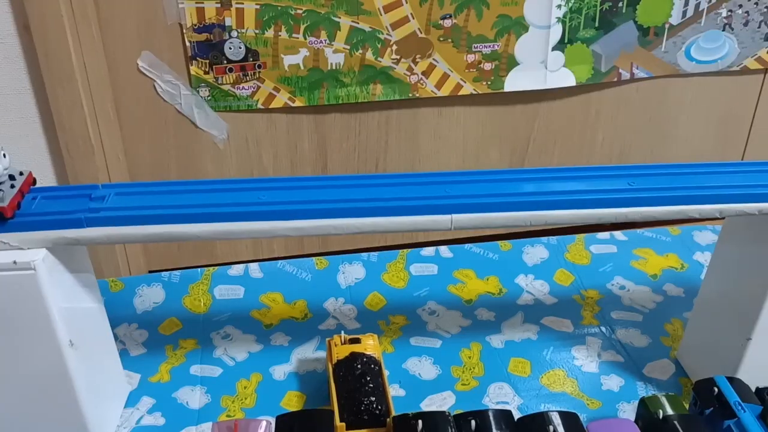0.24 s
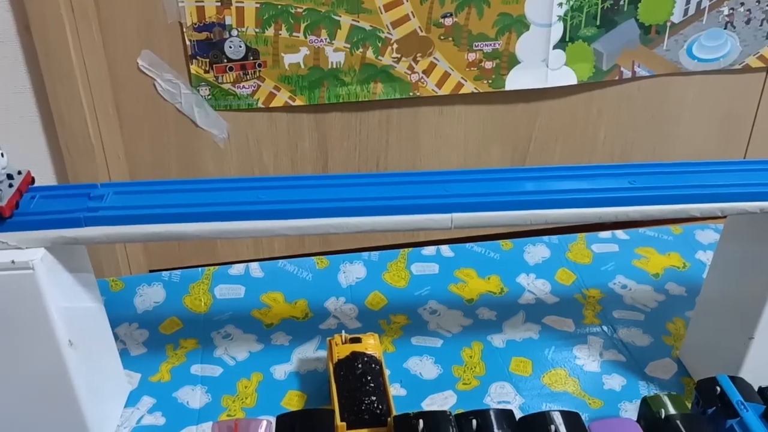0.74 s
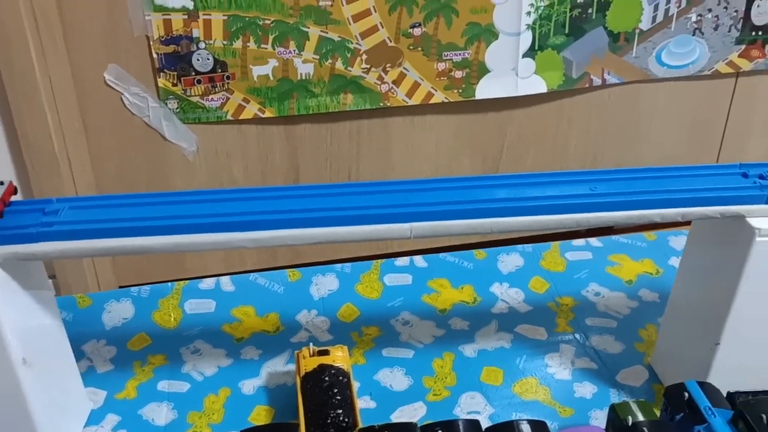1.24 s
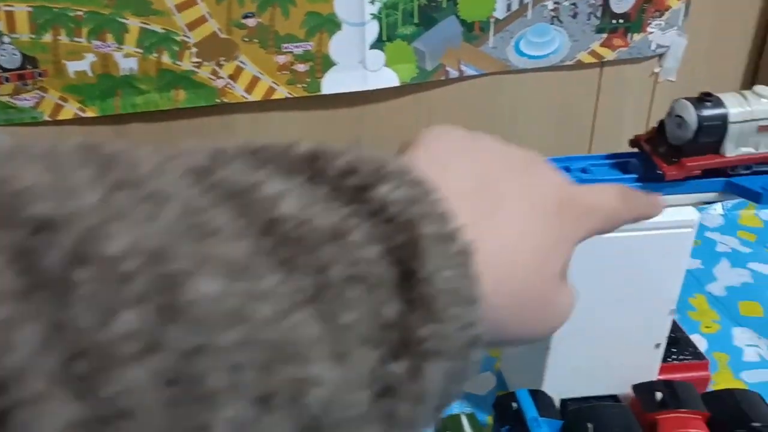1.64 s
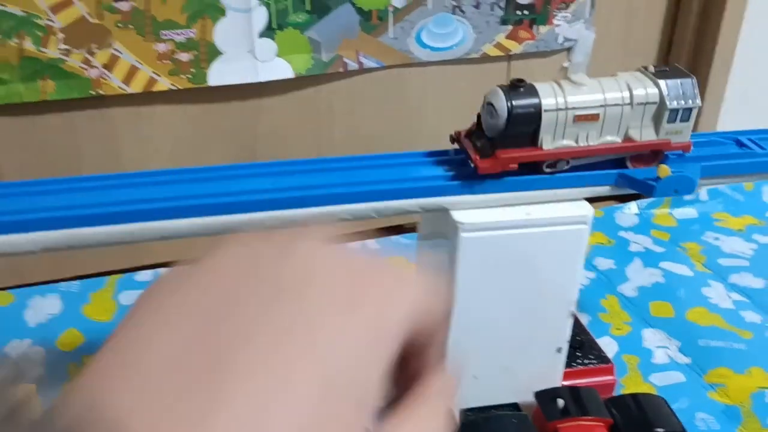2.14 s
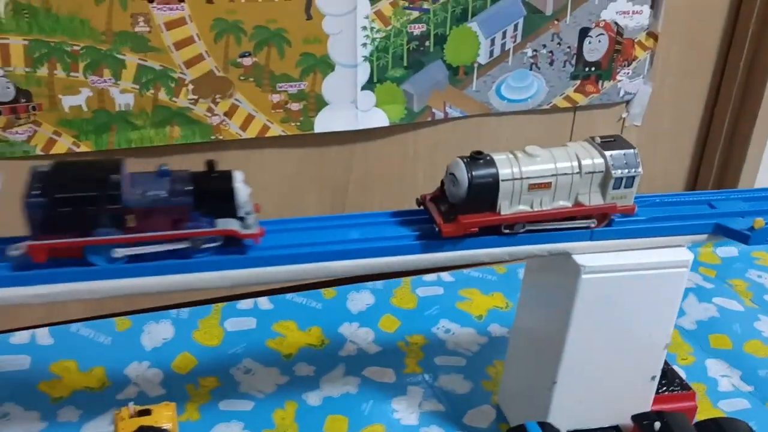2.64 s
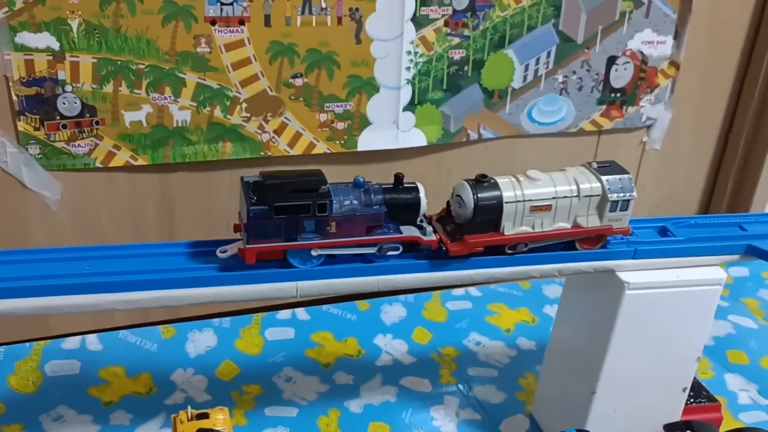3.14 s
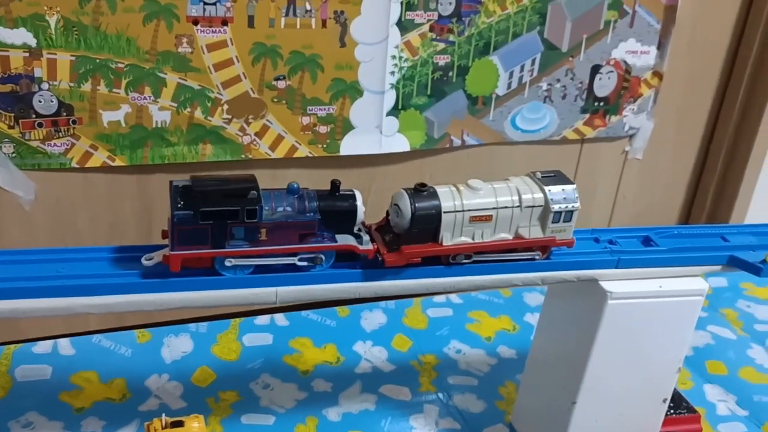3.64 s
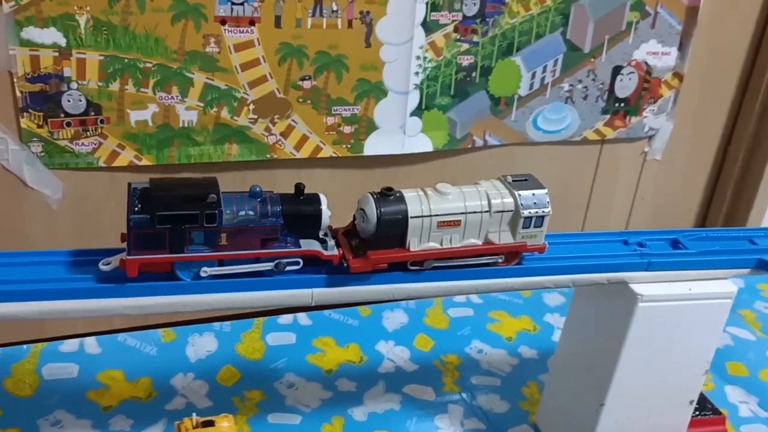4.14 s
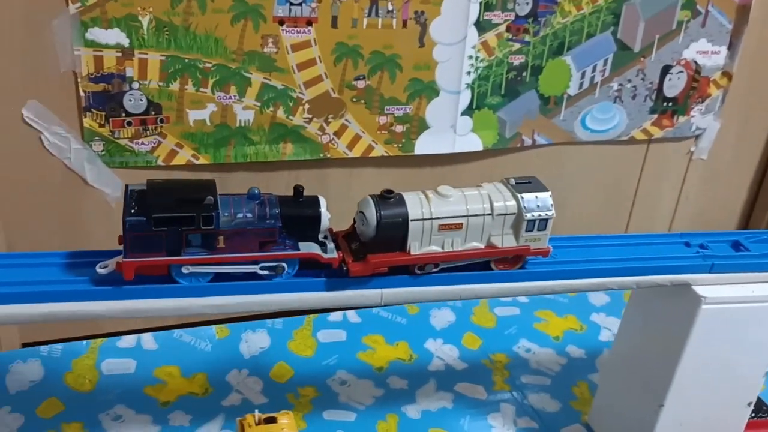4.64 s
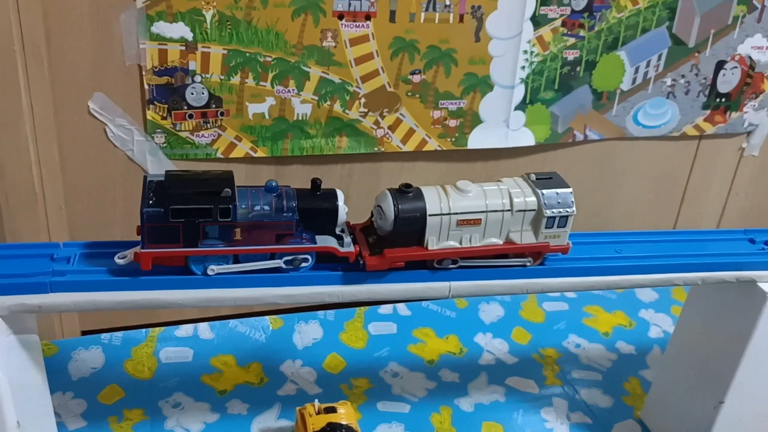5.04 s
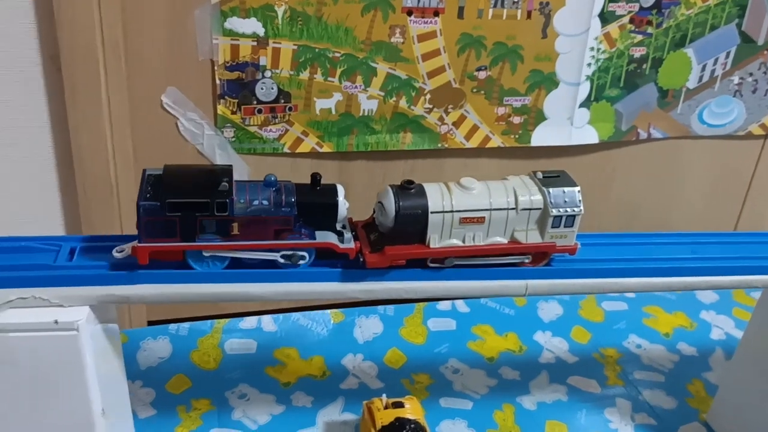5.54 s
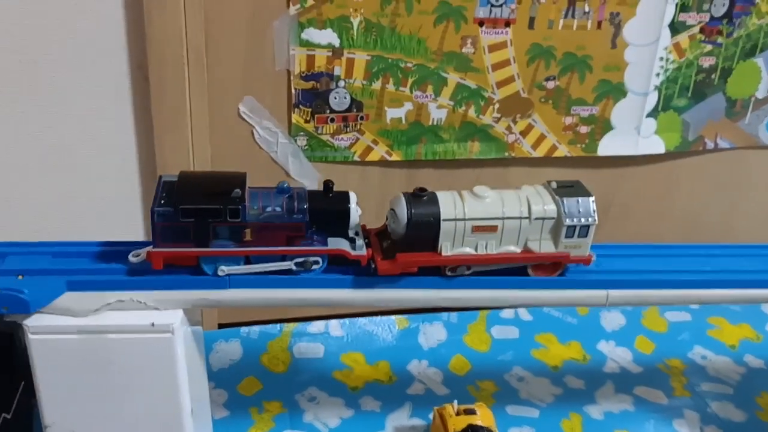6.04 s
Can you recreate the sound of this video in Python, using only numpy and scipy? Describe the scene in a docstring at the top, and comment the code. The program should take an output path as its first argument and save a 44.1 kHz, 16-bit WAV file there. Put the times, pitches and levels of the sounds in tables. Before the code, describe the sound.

In a quiet room, a battery toy engine whirs with chattery plastic gears and little track knocks. A second, nearer engine joins, brighter and busier. They collide with a hard plastic knock around three seconds, rolling stops, and slipping gears clack sharply about ten times a second over a straining motor whine until the end. Close stereo microphone.

```python
"""Over a low room hush and faint wavering tones, two battery toy engines roll on a plastic track.
Gear teeth chatter as trains of uneven blows on noise, filtered by the resonances of the plastic shells;
knocks are decaying noise bursts, and soft bumps are damped cosines. The engines then meet nose to nose and
push: a gear strains, with mesh noise and a resonant motor whine, and slips ten times a second with a sharp
noise-burst clack that the walls return. The two microphone ports colour the sound differently."""
import sys
import numpy as np
from scipy import signal
from scipy.fft import rfft, irfft
from scipy.io import wavfile
from scipy.ndimage import uniform_filter1d

SR = 44100
rng = np.random.default_rng(int(sys.argv[2]) if len(sys.argv) > 2 else 0)


def log_audio(samples):
    """Write samples as a 16-bit WAV file to the path given in sys.argv[1]."""
    # one column per channel
    frames = np.atleast_2d(samples).T
    # limit to full scale, then quantise
    limited = np.clip(frames, -1, 1)
    pcm = np.round(limited * 32767).astype(np.int16)
    wavfile.write(sys.argv[1], SR, pcm)


def field_ratio(decibels):
    """Amplitude ratio for a level in dB (20 dB per decade); scalars and array-likes work."""
    return 10 ** (np.asarray(decibels, dtype=float) / 20)


N = 277830
TIME = np.arange(N) / SR  # seconds

# All levels below are ahead of the gain in FADE_IN. Spectra and resonances shape a sound;
# its level is set separately. Resonance heights are relative to the surrounding spectrum.

# Spectrum of the room hush. Each row: frequency in Hz, relative density in dB per Hz.
HUSH_SPECTRUM = [(18, -83), (30, -51), (103, -4.5), (245, -9), (371, -7.5), (407, -9.5), (546, -15.5),
                 (1200, -10.5), (1560, -49), (2640, -120)]
HUSH_DB = -68  # rms of the wavering hush
# Faint wavering tones and squeals. Each row: start in seconds, end in seconds, first pitch in Hz,
# last pitch in Hz, width in Hz, left level in dB, right level in dB.
FUZZY_TONES = [(0, 2, 960, 935, 5, -71, -71.5), (2.62, 2.92, 194, 264, 23, -68, -66),
               (1.42, 1.86, 3560, 3600, 120, -54, -60), (1.72, 1.98, 2230, 2110, 140, -54, -50),
               (2.06, 2.38, 2050, 2120, 110, -58, -54.5), (2.2, 2.55, 5150, 5280, 170, -65, -55)]

# Chatter as the engines move about. Each row: time in seconds, chatter level in dB.
CHATTER = [(0.3, -53.5), (0.45, -55), (1.04, -55.5), (1.18, -50), (1.41, -56), (1.64, -57.5), (1.86, -57),
           (2.15, -54.5), (2.4, -53.5), (3.0, -54), (3.12, -54.5), (3.21, -50.5)]
USUAL_DB = -55  # chatter level at which the three bands have their usual levels
# The chatter surges, then lets go. Each row: end in seconds, length in seconds, rise in dB.
SURGES = [(0.408, 0.086, 4), (0.807, 0.1, 4.5), (1.255, 0.057, 7), (1.342, 0.057, 3.5), (1.648, 0.24, 5),
          (1.883, 0.092, 2), (2.35, 0.17, 3), (2.492, 0.026, 3), (2.628, 0.048, 5), (2.778, 0.16, 2),
          (3.018, .05, 8.5), (3.07, 0.045, 5), (3.188, 0.031, 3)]
SURGE_RISE, LET_GO_S = 0.12, 0.01  # share of the length spent rising, time to drop back
# Part of the second engine in the sound. Each row: time in seconds, share from 0 to 1.
SECOND_SHARE = [(0, 0.12), (1.3, 0.34), (1.65, 0.58), (1.8, 0.82), (2.05, 0.7), (2.3, 0.46), (2.55, 0.57),
                (2.7, 0.6), (2.95, 0.84), (3.14, 0.97), (3.24, 0.87)]
# First engine through the ports. Each row: frequency in Hz, left gain in dB, right gain in dB.
FIRST_SPECTRUM = [(60, -5, -14), (149, -9.5, -18), (673, -10.5, -18.5), (1750, -0.5, -2), (1617, 1, -0.5),
                  (6260, -4.5, -0.5), (5870, 0, -10), (7600, -12, -3.5), (7400, -43, -35), (8160, -5, -14),
                  (8400, -21, -23.5), (11720, -35.5, -60), (11100, -12, -35), (15700, -17.5, -30)]
# Second, nearer engine. Each row: frequency in Hz, left gain in dB, right gain in dB.
SECOND_SPECTRUM = [(60, -14, -12), (152, -6, -16.5), (700, -14, -4.5), (1490, -28, -5.5), (1900, -1.5, 3),
                   (5400, -6, 0.5), (6000, 2.5, -4.5), (7490, 4, -4.5), (7800, -2.5, -59),
                   (8470, -14.5, -45), (8700, -24, -58), (11200, -33, -63), (11520, -13, -32),
                   (15100, -18, -50)]
# Resonances of the engine shells. Each row: frequency in Hz, width in Hz, left and right height in dB.
FIRST_SHELL = [(1750, 200, 6, 8), (2160, 110, 15, 14), (2650, 140, 11, 14), (3560, 160, 12, 14),
               (4400, 200, 4, 6), (4900, 120, 5, 9), (5200, 260, 11, 14)]
SECOND_SHELL = [(478, 160, 11, 4.1), (1270, 300, 1.7, 1.7), (1520, 190, 1.7, 13.6), (2100, 290, 2.1, 6.1),
                (2412, 15, 26, 6.8), (3950, 840, 18, 12.8), (4630, 510, 0.57, 16), (5540, 130, 2.4, 2.2)]
# How each band of the chatter follows. Each row: level in dB at usual chatter, dB per dB of chatter,
# dB added at full share of the second engine, flicker in dB.
LOW_SHELL = (-55.5, 0.85, 6.5, 0.1)
UPPER_SHELL = (-49, 1.04, -1.4, 0.63)
TREBLE = (-64, 0.96, 3.5, 0.6)
FLICKER_S = 0.023  # averaging time of the flicker

# Wheels and couplings knocking. Each row: time in seconds, nominal onset level in dB,
# treble relative to it in dB, t60 in seconds.
KNOCKS = [(0.348, -44, -22, 0.075), (0.547, -34, -21, 0.013), (0.5672, -36.5, -18.5, 0.024),
          (0.68, -39, -20, 0.05), (0.843, -38, -17, 0.04), (0.8632, -37.5, -20, 0.03),
          (0.963, -40, -23, 0.03), (1.0405, -37.5, -14, 0.065), (1.0734, -38, -8, 0.034),
          (1.209, -34.5, 1.5, 0.094), (1.2374, -47, -21, 0.072), (1.265, -38, -7, 0.074),
          (1.3054, -39.5, -13, 0.067), (1.7317, -40, -13, 0.059), (2.0202, -27, -9.5, 0.029),
          (2.032, -29, -16, 0.037), (2.149, -40.5, -12, 0.065), (2.1915, -42.5, -14, 0.07),
          (2.245, -38, -14, 0.071), (2.4103, -40.5, -12, 0.18), (2.546, -34.5, -12, 0.05),
          (2.62, -42, -10, 0.026), (2.684, -36, -7, 0.038), (2.9572, -19, -16, 0.069),
          (3.048, -28.5, -21, 0.16), (3.133, -37, -22, 0.096), (3.1807, -34, -29, 0.051)]
RISE_SHARE = 0.033  # a knock swells for this share of its t60
# Hollow resonances of a knock. Each row: frequency in Hz, width in Hz, height in dB.
HOLLOW_MODES = [(390, 55, 18), (880, 330, 21.5), (1214, 100, 34), (1578, 72, 38), (4660, 21, 29),
                (4370, 34, 39), (5250, 71, 17)]
HOLLOW_FROM, HOLLOW_SLOPE = 0.39, 0.94  # second share where hollow ring begins, ring per share above it

# Soft dull bumps. Each row: time in seconds, left and right level in dB ahead of the high-pass,
# frequency in Hz, damping in nepers per cycle.
BUMPS = [(1.1515, -34, -38, 490, 3.9), (1.3867, -38.5, -45, 326, 1.5), (1.5665, -38.5, -43.5, 310, 0.61),
         (2.0073, -49, -47, 209, 1.2), (2.5192, -62, -18, 85, 1.3), (3.304, -44, -41, 517, 0.92),
         (3.66, -37, -61, 390, 3), (3.782, -79, -31.5, 118, 2), (4.55, -65, -25.5, 124, 4.5),
         (4.61, -67, -32, 325, 2.2), (4.012, -40, -43, 900, 0.54), (5.16, -50, -42, 130, 3.3),
         (5.357, -47, -40, 110, 3.7), (5.477, -59, -33, 170, 4.7), (5.521, -54, -32, 170, 6),
         (3.14, -52, -48, 590, .5)]

# Gear slips. Each row: time in seconds, gearbox ring in dB, body in dB, both at the right port.
SLIPS = [(3.2316, -25.5, -36), (3.353, -26, -29.5), (3.4436, -21.5, -29), (3.5526, -23, -31),
         (3.6593, -22.5, -30), (3.756, -21, -32), (3.8499, -25.5, -27.5), (3.951, -21, -29.5),
         (4.0511, -23.5, -28.5), (4.1519, -25.5, -25.5), (4.2618, -22, -32), (4.373, -19.5, -33),
         (4.4702, -21.5, -31), (4.563, -20, -40.5), (4.6577, -21.5, -31), (4.753, -25, -33),
         (4.85, -23, -31.5), (4.9513, -23.5, -35.5), (5.06, -24, -52), (5.1591, -18.5, -53),
         (5.257, -23, -25.5), (5.3546, -18.5, -38), (5.455, -20, -48), (5.5534, -20, -40),
         (5.648, -21, -56), (5.7521, -19, -54), (5.8485, -25.5, -36), (5.9402, -20, -34.5),
         (6.0373, -21, -40), (6.1348, -20, -33.5), (6.2352, -21.5, -41)]
# Clack spectrum. Each row: frequency in Hz, left gain in dB, right gain in dB.
CLACK_SPECTRUM = [(100, -6, -13), (1280, -27.5, -12.5), (2270, -58, 4.5), (4160, -19, -11.5),
                  (4750, -23, -13), (6500, -9, -1), (8100, -1.5, -20), (7170, -10.5, -31),
                  (9400, -16.5, -18), (11660, -13.5, -8), (11770, -4.5, -17), (12850, -12, -12.5),
                  (15860, 5.5, 4), (15600, -49, 5.5)]
# Two gearbox resonances, then two narrow treble peaks used only in the clack.
# Each row: frequency in Hz, width in Hz, left and right height in dB.
CLACK_PEAKS = [(4273, 290, -13, 6.5), (4653, 320, 0.5, 9.5), (11670, 130, 7, -30), (13150, 160, 5.5, 4)]
GEARBOX = CLACK_PEAKS[:2]
# Treble snap of a slip. Each holds left and right: mean level in dB, then scatter in dB.
SNAP_DB = (-26.5, -31.5)
SNAP_SPREAD_DB = (2.5, 1.5)
# Pushing. Each row: time in seconds, base level of the strain in dB, wall return of the clacks in dB.
PUSHING = [(3.24, -51, -38), (3.39, -54, -35.5), (3.96, -52.5, -36), (4.39, -53, -36.5), (5.73, -53, -35.5),
           (6.3, -55.5, -35.5)]
# From one slip to the next. Each row: share of the cycle, mesh in dB and whine in dB over the base level,
# mean whine pitch in Hz as load slows the motor.
STRAIN = [(0, 15, -14, 1810), (.08, 9, 6.5, 2100), (.2, -0.5, 5.5, 2030), (.4, 12.5, 3.5, 2050),
          (.6, 12, 7, 1980), (.85, 8, 9, 1770), (1, 13, -8, 1750)]
# Mesh spectrum. Each row: frequency in Hz, left gain in dB, right gain in dB.
MESH_SPECTRUM = [(60, -16, -11), (148, -18.5, -16.5), (675, -11.5, -11.5), (1490, -6.5, -1.5),
                 (2780, -4.5, 1.5), (3810, -2, -2), (5100, -9, -9.5), (7200, -2.5, -9.5), (8000, -31, -27),
                 (8400, -5, -30), (8700, -18, -22), (11150, -25, -45), (11600, -4.5, -34),
                 (15900, -19, -16)]
# Clack back from the walls. Each row: frequency in Hz, left gain in dB, right gain in dB.
RETURN_SPECTRUM = [(300, -79, -23), (1210, -57, -12.5), (2300, -1, -3.5), (4100, -16, 0), (5400, -10, 1),
                   (7730, -7.5, -9.5), (7800, -54, -21), (8320, -9, -12), (8540, -28, -48),
                   (12200, -8, -44), (11400, -4, -20), (12700, -3.5, -8), (13200, 1.5, -14),
                   (16800, -5.5, -24)]

# Gain at the start, held after the last row. Each row: time in seconds, gain in dB.
FADE_IN = [(0, -55), (.03, -23.5), (.12, -9.5), (.3, -4)]


def evened(x):
    """Normalizes the mean power of a signal: rms 1."""
    return x / np.sqrt(np.mean(x ** 2) + 1e-20)


def along(rows, at):
    """Interpolates every column of a table linearly over its first column."""
    first, *columns = np.transpose(rows)
    return np.array([np.interp(at, first, column) for column in columns])


def colour(points, modes, hz, edge_hz=15780):
    """Transfer gain of both ports: a spectrum raised by resonance peaks, band-limited at both ends."""
    edge = 1 / (1 + (hz / edge_hz) ** 150) / (1 + (45 / (hz + 1)) ** 4)
    lift = 1 + sum(field_ratio(np.c_[db]) / (1 + (2 * (hz - f) / width) ** 2) for f, width, *db in modes)
    points = np.array(points)
    log_points = np.c_[np.log(points[:, 0]), points[:, 1:]]
    return field_ratio(along(log_points, np.log(hz + 1))) * lift * edge


def causal(x, points, modes):
    """Minimum-phase filtering: the log gain fixes the phase; mean power gain over the ports is 1."""
    log_gain = np.log(colour(points, modes, abs(np.fft.fftfreq(8192, 1 / SR))) + 1e-6)
    response = np.fft.ifft(np.exp(np.conj(signal.hilbert(log_gain)))).real
    taps = response[:, :3000] * np.hanning(6000)[3000:]
    taps = taps / np.sqrt((taps ** 2).sum(1).mean())
    return signal.oaconvolve(x, taps, axes=1)[:, :x.shape[1]]


def split(x, *edges_hz):
    """Band division by differences of zero-phase low-passes, each band of rms 1."""
    lows = [signal.sosfiltfilt(signal.butter(6, hz, fs=SR, output="sos"), x) for hz in edges_hz]
    return [evened(high - low) for low, high in zip([0] + lows, lows + [x])]


def pair(same, lag):
    """Partial coherence: noise at two ports, partly alike, the left leading by lag samples."""
    a, b = rng.standard_normal((2, N))
    return np.array([np.roll(a, -lag), same * a + np.sqrt(1 - same ** 2) * b])


def teeth(per_s, jitter, spread_db, t60, blur):
    """Repeated impact of gear teeth: uneven, decaying blows over a steady blur, as an envelope."""
    wander = evened(uniform_filter1d(rng.standard_normal(N), 600))
    turns = np.cumsum(per_s * np.exp(jitter * wander)) / SR
    blows = np.diff(np.floor(turns), prepend=0) * field_ratio(spread_db * rng.standard_normal(N))
    ring = signal.lfilter([1], [1, -field_ratio(-60 / (t60 * SR))], blows)
    return evened(blur + uniform_filter1d(ring, 30))


def resonate(x, hz, width):
    """A moving resonance: shifts the pitch curve to zero, low-passes, shifts back; rms 1."""
    turn = np.exp(2j * np.pi * np.cumsum(hz) / SR)
    r = np.exp(-np.pi * width / SR)
    return evened((turn * signal.lfilter([1 - r], [1, -r], x / turn)).real)


def room_tone():
    """Diffuse background: low filtered noise, partly coherent at the ports and wavering a little."""
    waver = field_ratio(1.3 * evened(uniform_filter1d(rng.standard_normal((2, N)), 1500)))
    spectrum = [(f + 1, db, db) for f, db in HUSH_SPECTRUM]
    return field_ratio(HUSH_DB) * evened(causal(pair(0.6, lag=0) * waver, spectrum, []))


def fuzzy_tones():
    """Narrow-band noise: a chattering source through gliding resonances, reaching the left port sooner."""
    out = np.zeros((2, N))
    chatter = teeth(101, .1, 3, .03, .3)
    for start, end, from_hz, to_hz, width, *db in FUZZY_TONES:
        on = np.interp(TIME, [start, start + .05, end - .05, end], [0, 1, 1, 0])
        hz = np.interp(TIME, [start, end], [from_hz, to_hz])
        narrow = resonate(rng.standard_normal(N) * chatter, hz, width)
        tone = on * resonate(narrow, hz, 4 * width)
        out += field_ratio(np.c_[db]) * np.array([np.roll(tone, -16), tone])
    return out


def rolling():
    """Forced vibration: tooth chatter rings the engine shells, mixed in power by the second's share."""
    chatter_db = along(CHATTER, TIME)[0] - USUAL_DB
    for end, length, db in SURGES:
        risen = end - length * (1 - SURGE_RISE)
        chatter_db += np.interp(TIME, [end - length, risen, end, end + LET_GO_S], [0, db, db, 0])
    second = along(SECOND_SHARE, TIME)[0]
    one = causal(pair(.7, lag=16) * teeth(101, .07, 2.6, .03, .2), FIRST_SPECTRUM, FIRST_SHELL)
    two = causal(pair(.5, lag=16) * teeth(140, .3, 3, .025, .4), SECOND_SPECTRUM, SECOND_SHELL)
    bands = split(np.sqrt(1 - second) * one + np.sqrt(second) * two, 3100, 9500)
    flicker = evened(uniform_filter1d(rng.standard_normal(N), round(FLICKER_S * SR)))
    out = np.zeros((2, N))
    for band, (db, follow, near_db, flicker_db) in zip(bands, (LOW_SHELL, UPPER_SHELL, TREBLE)):
        out += field_ratio(db + follow * chatter_db + near_db * second + flicker_db * flicker) * band
    return out * np.interp(TIME, [3.22, 3.24], [1, 0])  # rolling stops


def knocks():
    """Impact and free decay: bursts in the shell, more hollow as the second engine's share grows."""
    blow, out = pair(0.69, lag=11), np.zeros((2, N))
    shell, treble = split(causal(blow, SECOND_SPECTRUM, SECOND_SHELL), 9500)
    ring = evened(causal(blow, [(500, 4.9, 0), (8000, 2.5, 0)], HOLLOW_MODES))
    for s, onset_db, treble_db, t60 in KNOCKS:
        at = slice(round(s * SR), round((s + .3) * SR))
        t = TIME[at] - s
        hollow = np.clip(HOLLOW_SLOPE * (along(SECOND_SHARE, s)[0] - HOLLOW_FROM), 0, 1)
        shape = field_ratio(onset_db - 60 * t / t60) * np.clip(t / (RISE_SHARE * t60), 0, 1)
        burst = (1 - hollow) * shell[:, at] + hollow * ring[:, at] + field_ratio(treble_db) * treble[:, at]
        out[:, at] += shape * burst
    return out


def bumps():
    """Damped oscillation: a sudden push dies away as a decaying cosine, high-passed at 50 Hz."""
    t, out = np.arange(4000) / SR, np.zeros((2, N))
    for s, left_db, right_db, hz, damping in BUMPS:
        push = np.cos(2 * np.pi * hz * t) * np.exp(-t * hz * damping) * np.clip(t / 0.00015, 0, 1)
        out[:, round((s - .001) * SR):][:, :len(t)] += field_ratio([[left_db], [right_db]]) * push
    return signal.sosfiltfilt(signal.butter(1, 50, "high", fs=SR, output="sos"), out)


def clacks():
    """Filtered impulse: a slip's noise burst under a short two-sided envelope of about a millisecond."""
    size = 2048
    out = np.zeros((2, N + size))
    t, hz = (np.arange(size) - size // 2) / SR, np.fft.rfftfreq(size, 1 / SR)
    gain = colour(CLACK_SPECTRUM, CLACK_PEAKS, hz, edge_hz=15920)
    # the resonances are applied twice, for narrower, stronger peaks
    gain = gain * colour([(50, 0, 0), (16000, 0, 0.0088)], CLACK_PEAKS, hz, edge_hz=16600)
    body = (hz < 3600) * hz / (hz + 300)
    box, top = (hz >= 3600) & (hz < 5600), hz >= 5600
    noise = rng.standard_normal((len(SLIPS), 2, size))
    spread = rng.standard_normal((len(SLIPS), 4))
    for (s, box_db, body_db), (a, b), (u, v, *snap) in zip(SLIPS, noise, spread):
        early_side = np.exp(t / (.0009 * field_ratio(2.2 * u)))
        late_side = np.exp(-t / (.0017 * field_ratio(2.2 * v)))
        envelope = np.where(t < 0, early_side, late_side)
        z = rfft(np.array([0.087 * np.roll(a, -8) + 1.15 * b, a]) * envelope) * gain

        def level(band):
            """Rms of a band at each port, its energy referred to 3 ms."""
            return np.sqrt((irfft(z * band) ** 2).sum(1, keepdims=True) / (.003 * SR))

        snap_db = np.c_[np.add(SNAP_DB, np.multiply(SNAP_SPREAD_DB, snap))]
        body_gain = field_ratio(body_db) / level(body * (hz > 1500))[1]  # [1] is the right port
        box_gain = field_ratio(box_db) / level(box)[1]
        top_gain = field_ratio(snap_db) / level(hz > 11500)
        z = z * (body * body_gain + box * box_gain + top * top_gain)
        out[:, round(s * SR) - size // 2:][:, :size] += irfft(z)
    return out[:, :N]


def straining():
    """Load cycle of a motor: between slips the mesh swells and the whine sinks, varying each time."""
    slips = np.r_[np.array(SLIPS)[:, 0], SLIPS[-1][0] + .1]
    cycle = np.interp(TIME, slips, np.arange(len(slips)))
    mesh_db, whine_db, whine_hz = along(STRAIN, cycle % 1)
    pitch, strength = rng.standard_normal((len(slips), 2))[cycle.astype(int)].T
    mesh_noise = pair(.6, lag=8) * teeth(240, .5, 2.8, .022, .4)
    mesh = evened(causal(mesh_noise, MESH_SPECTRUM, GEARBOX))
    sway = 1 + .045 * pitch + .03 * evened(uniform_filter1d(rng.standard_normal(N), 900))
    rasp = rng.standard_normal(N) * teeth(90, 0.47, 1.6, 0.014, 0.83)
    whine = resonate(resonate(rasp, whine_hz * sway, 150), whine_hz * sway, 500)
    whine = np.array([field_ratio(-7.0) * np.roll(whine, -8), whine])  # left leads, weaker
    whine = field_ratio(whine_db + 2 * np.clip(strength, -2, 1)) * whine
    return (TIME > slips[0]) * field_ratio(along(PUSHING, TIME)[0]) * (field_ratio(mesh_db) * mesh + whine)


def walls():
    """Reverberation: the clack returns as noise after 9.5 ms and decays, faster at the right port."""
    slips = np.array(SLIPS)[:, 0]
    delayed = TIME - .0095
    since = delayed - slips[np.maximum(np.searchsorted(slips, delayed) - 1, 0)]
    t60 = np.array([[.45], [.27]])  # seconds, left and right
    decay = field_ratio(-60 * since / t60) * np.clip(since / 0.0071, 0, 1)
    back = causal(pair(0.58, lag=9) * teeth(200, 0.5, 1.5, 0.06, 1.5), RETURN_SPECTRUM, GEARBOX)
    return field_ratio(along(PUSHING, TIME)[1]) * decay * evened(back)


def scene():
    """Superposition of all sources at the two ports."""
    return (room_tone() + fuzzy_tones() + rolling() + knocks() + bumps()
            + clacks() + straining() + walls())


def band_limit(x):
    """A steep low-pass at the top of the band."""
    return signal.sosfilt(signal.butter(12, 16800, fs=SR, output="sos"), x)


def record(dry):
    """Time-varying gain: the mix fades in and then keeps a steady gain."""
    mix = dry * field_ratio(along(FADE_IN, TIME))
    return band_limit(mix)


dry = scene()
out = record(dry)
log_audio(out)
```